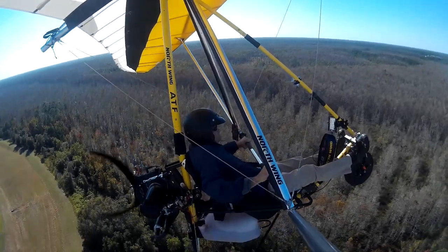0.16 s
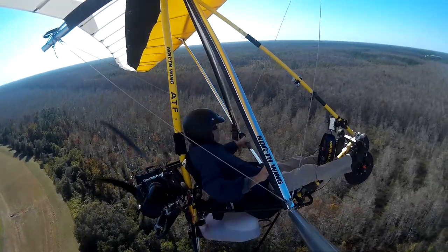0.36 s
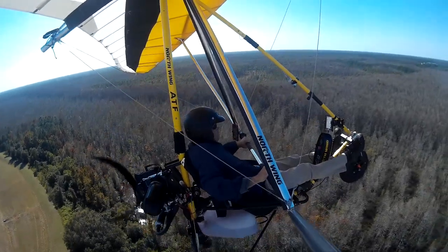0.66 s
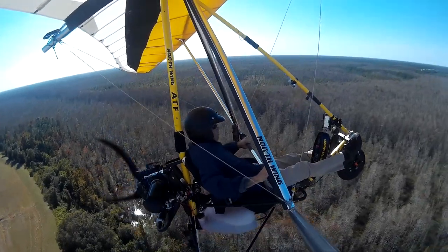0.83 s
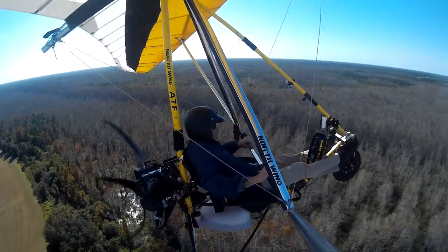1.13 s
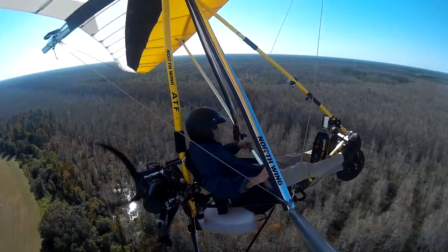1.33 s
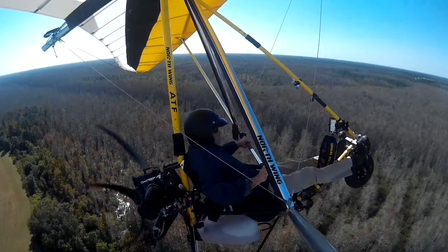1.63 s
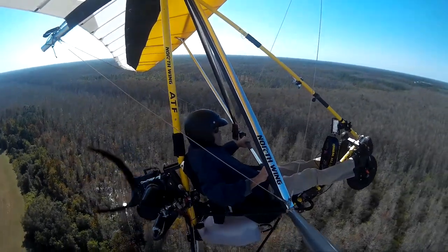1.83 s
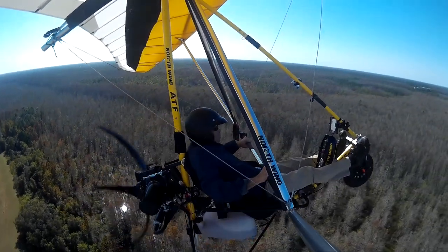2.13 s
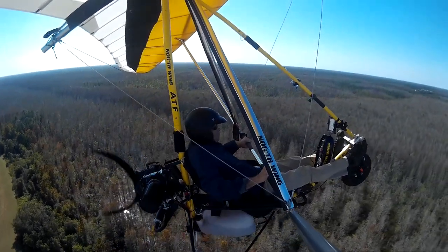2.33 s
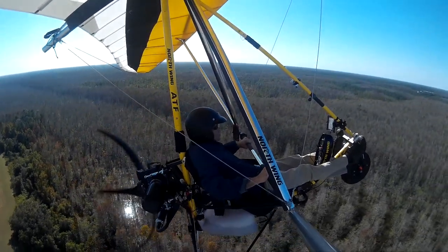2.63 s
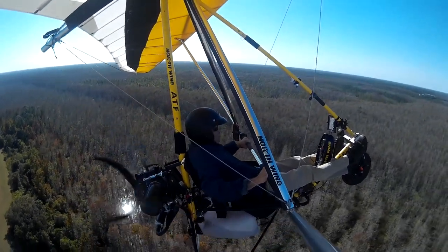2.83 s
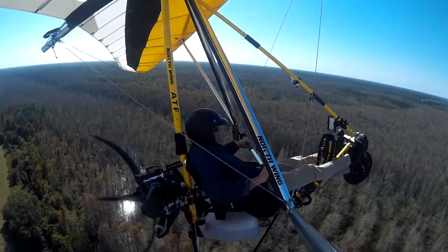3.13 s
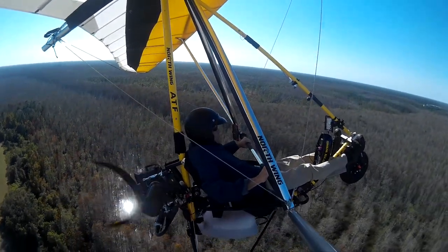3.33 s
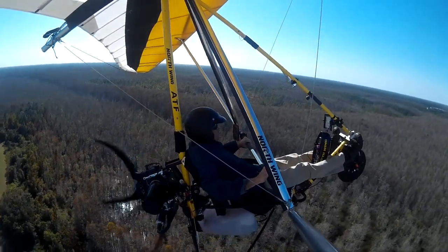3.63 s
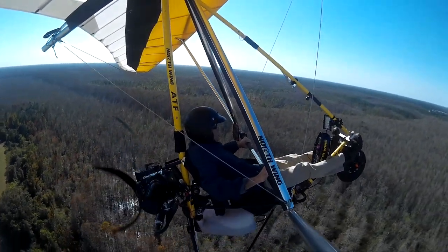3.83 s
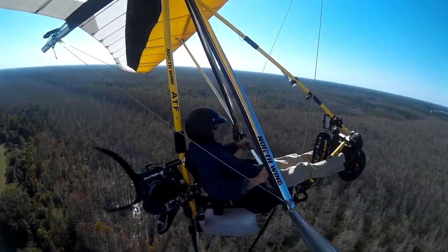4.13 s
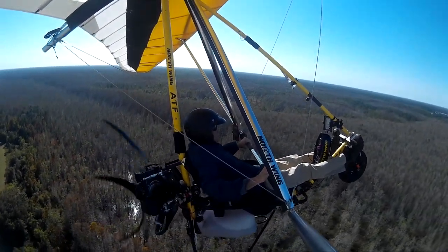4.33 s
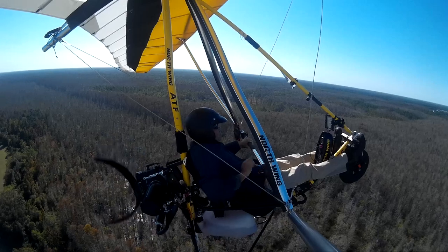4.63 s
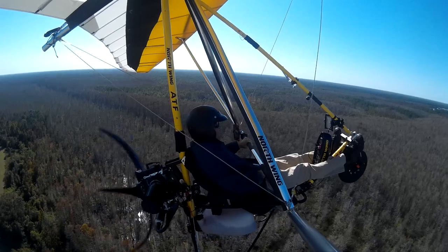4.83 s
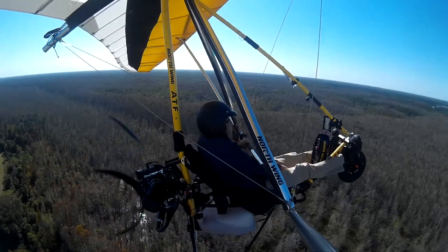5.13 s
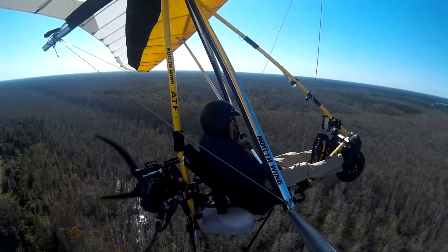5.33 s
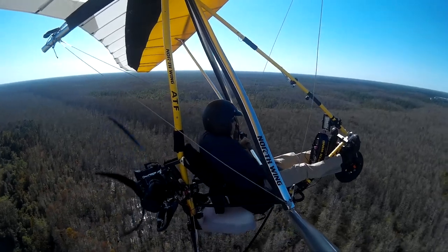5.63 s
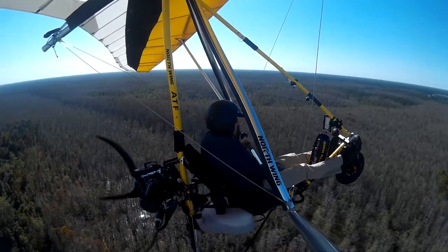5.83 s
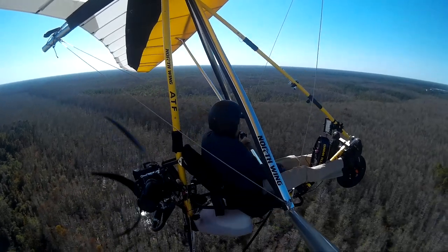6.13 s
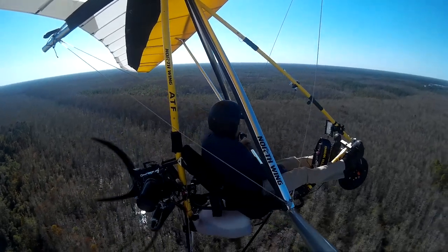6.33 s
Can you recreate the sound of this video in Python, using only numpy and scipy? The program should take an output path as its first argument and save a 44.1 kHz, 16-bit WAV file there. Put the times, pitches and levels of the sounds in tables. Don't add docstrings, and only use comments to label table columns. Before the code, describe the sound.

Steady throbbing propeller and low engine drone in flight, swamped by distorted wind rumble and hiss, with irregular dry clicks and rattling knocks.

```python
import sys
import numpy as np
from scipy import signal
from scipy.fft import rfft, irfft
from scipy.io import wavfile

SR = 44100
rng = np.random.default_rng(int(sys.argv[2]) if len(sys.argv) > 2 else 0)


def boost_factor(decibels):
    exponent = np.asarray(decibels, float) / 20
    return 10 ** exponent


def unload_audio(sound):
    columns = np.transpose(np.atleast_2d(sound))
    steps = np.round(np.clip(columns, -1, 1) * 32767)
    wavfile.write(sys.argv[1], SR, steps.astype(np.int16))


N = 285768

# [t/s, firing rate f/Hz]
FIRING_RATE = [(0, 137.72), (.7, 137.69), (1.8, 137.77), (2.5, 137.66), (3.3, 137.76), (4.1, 137.6),
               (4.8, 137.82), (5.5, 137.7), (6.48, 137.8)]
# [multiple of blade rate, rms level/dB, lag/rad]
BLADE_TONES = [
    (1, -9, 0),
    (2, -11, 1.66),
    (3, -28, 3),
    (4, -33.5, 0.06),
    (5, -48, 4.5),
    (11, -42.5, 4),
]
# [multiple of firing rate, rms level/dB]
ENGINE_TONES = [(1, -18), (2, -18), (3, -32.5), (4, -39), (6, -59), (10, -48.5), (11, -38), (12, -45.5),
                (13, -42), (16, -46), (17, -46), (20, -53), (21, -50.5), (24, -67), (32, -67), (42, -66),
                (49, -65.5), (50, -62), (52, -71), (53, -67), (65, -71), (82, -69), (84, -75)]
EXHAUST_LAGS = [0, 3.075, 1.34]
# [firing multiple, blade multiple, rms level/dB, lag/rad]
CHOPPED_EXHAUST = [(2, -1, -21.5, -1.77), (1, 1, -23.5, -3), (-2, 5, -29.5, 0.77), (-1, 3, -27.5, -2)]
# [t/s, gust level/dB, shaking level/dB]
WIND = [(0, -12, -47), (.45, -11.5, -49.5), (.8, -14.5, -44), (1.3, -13, -41), (1.7, -13, -42.5),
        (1.95, -14, -32), (2.2, -15.5, -42), (2.7, -13, -41.5), (3.2, -14, -47.5), (3.8, -16.5, -40),
        (4.3, -15, -48), (4.63, -14.5, -37.5), (4.9, -14, -42), (5.4, -15, -44.5), (5.9, -16, -41),
        (6.48, -16.5, -44)]
# [f/Hz, level per Hz/dB]
BUFFET_COLOUR = [(60, -16.5), (110, -3.5), (200, 2.5), (300, -2), (500, -13.5), (900, -26.5), (1500, -43)]
# [f/Hz, level per Hz/dB]
RUMBLE_COLOUR = [(16, -30.5), (35, -11), (60, -2.5), (110, -1.5), (170, 0), (320, -14.5)]
# [f/Hz, level per Hz/dB]
HISS_COLOUR = [(500, 3.5), (1000, -2), (1300, -4), (1900, -3.5), (2500, -17.5), (3400, -14.5),
               (3700, -22.5), (5300, -24), (7500, -40.5), (10000, -34), (10900, -39.5), (11700, -33),
               (14000, -48), (16000, -45)]
# [t/s, peak level/dB, bright ring level/dB]
KNOCKS = [(0.025, -19.5, -40), (0.0747, -22.5, -38.5), (0.682, -25, -49), (1.0128, -18.5, -43),
          (1.027, -23, -35.5), (1.0414, -20.5, -42), (1.1414, -25, -50), (1.3318, -23, -46),
          (1.3556, -23.5, -41), (1.3828, -24, -42), (1.557, -22, -34), (1.7325, -24, -38.5),
          (1.8332, -26, -49), (1.914, -24, -45.5), (1.942, -18.5, -37.5), (1.9924, -24, -55),
          (2.4585, -24, -47), (2.7725, -24, -45), (2.8205, -26, -49), (3.7132, -24, -39.5),
          (4.6306, -20, -36), (4.7459, -19.5, -39), (4.8557, -28, -49), (5.0101, -21.5, -38.5),
          (5.1163, -23, -47), (5.46, -25.5, -46), (5.6241, -23.5, -46), (5.7243, -20, -37.5),
          (5.9603, -18.5, -44), (6.0761, -20.5, -47)]
# [t/s, peak level/dB, bright ring level/dB]
TAPS = [(0.2354, -31, -46), (1.2277, -27, -49), (1.459, -28, -48), (1.6886, -26, -45), (2.014, -31, -52),
        (2.066, -32, -52), (2.4927, -25, -48), (4.142, -30, -46), (4.529, -26, -46), (4.5993, -21, -39),
        (4.6455, -26, -44), (5.233, -28, -50), (5.5724, -29, -42), (5.8274, -29.5, -46), (6.0892, -23, -47),
        (6.3335, -28, -51)]
# [f/Hz, width/Hz, level/dB]
FITTING_MODES = [(1810, 450, 6), (4150, 690, 2), (5640, 730, -0.5), (6570, 1900, -8.5), (9960, 1170, 2),
                 (11800, 1000, -6.5), (14500, 1800, -9)]


def rms_one(x):
    return x / np.sqrt(np.mean(x ** 2) + 1e-20)


def in_time(rows):
    s, *columns = np.transpose(rows)
    return [np.interp(np.arange(N) / SR, s, column) for column in columns]


def drift(rate):
    r = np.exp(-80 * np.pi * rate / SR)
    noise = rng.standard_normal(N // 40 + 2002)
    slow = signal.lfilter([1], [1, -2 * r, r * r], noise)[2000:]
    return np.interp(np.arange(N) / 40, np.arange(len(slow)), rms_one(slow))


def propeller(turns):
    phase = 2 * np.pi * 0.7107 * turns
    thump = 0
    for multiple, db, lag in BLADE_TONES:
        level = np.sqrt(2) * boost_factor(db + 0.7 * drift(2.3))
        thump = thump + level * np.cos(multiple * (phase + 0.045 * drift(4.5)) + lag)
    return thump


def engine(turns):
    phase = 2 * np.pi * (turns + 0.004 * drift(9))
    anyhow = rng.uniform(0, 2 * np.pi, len(ENGINE_TONES) - len(EXHAUST_LAGS))
    lags = list(EXHAUST_LAGS) + list(anyhow)
    tones = [(multiple, db, lag) for (multiple, db), lag in zip(ENGINE_TONES, lags)]
    for firing, blades, db, lag in CHOPPED_EXHAUST:
        tones.append((firing + blades * 0.7107, db, lag))
    drone = 0
    for multiple, db, lag in tones:
        level = np.sqrt(2) * boost_factor(db + 2.52 * drift(4.9))
        drone = drone + level * np.cos(multiple * phase + lag)
    return drone


def eddies(colour, shared_db, own_db, rate):
    hz = np.arange(1, N // 2 + 2) * SR / N
    points = np.array(colour)
    colour_db = np.interp(np.log(hz), np.log(points[:, 0]), points[:, 1], -70, -70)
    spectrum = rfft(rng.standard_normal(N)) * boost_factor(colour_db)
    lowest, highest = int(np.log2(points[0, 0])), int(np.log2(points[-1, 0])) + 1
    air, together = 0, drift(rate)
    for octave in range(lowest, highest + 1):
        band = irfft(spectrum * np.clip(1 - abs(np.log2(hz) - octave), 0, 1), N)
        air = air + band * boost_factor(shared_db * together + own_db * drift(rate))
    return rms_one(air)


def buffet(gust_db):
    return boost_factor(-8.5 + 1.73 * gust_db) * eddies(BUFFET_COLOUR, shared_db=1.04, own_db=1.43, rate=15)


def rumble():
    return boost_factor(-9.5) * eddies(RUMBLE_COLOUR, shared_db=1.2, own_db=1.8, rate=11.5)


def resonance(x, hz, width):
    r = np.exp(-np.pi * width / SR)
    return signal.lfilter([(1 - r * r) / 2, 0, (r * r - 1) / 2],
                          [1, -2 * r * np.cos(2 * np.pi * hz / SR), r * r], x)


def rattle(shaking_db):
    s, peak_db, bright_db = np.transpose(KNOCKS + TAPS)
    at = (s * SR).astype(int)
    mean_db = shaking_db.mean()
    struck = rng.random(N) < 220 / SR
    chatter = struck * boost_factor(shaking_db + 2.5 + 2.3 * np.minimum(rng.exponential(1, N), 2.5))
    strays_per_s = 4.5 * boost_factor(2 * (shaking_db - mean_db))
    stray = rng.random(N) < strays_per_s / SR
    chatter += stray * boost_factor(mean_db + 9.5 + rng.normal(0, 2.2, N))

    burst = np.arange(300) / SR
    shape = (1 - np.exp(-burst / 0.001)) * np.exp(-burst / 0.0015)
    grit = rng.choice([-1., 1.], N)
    out = 0
    for k, (hz, width, db) in enumerate(FITTING_MODES):
        bright = hz > 7500
        blows = chatter * boost_factor(-12 * bright)
        knock_db = bright_db + 8.5 if bright else peak_db + 5 - 3 * (hz > 4800)
        blows[at] = boost_factor(knock_db)
        scrape = grit * signal.oaconvolve(blows, shape)[:N]
        out = out + (-1) ** k * boost_factor(db + 9) * resonance(scrape, hz, width)
    return out


def lull():
    marks = np.zeros(N)
    marks[(np.array(KNOCKS + TAPS)[:, 0] * SR).astype(int) + 60] = 1
    return 1 - 0.72 * np.clip(signal.oaconvolve(marks, np.hanning(400), "same"), 0, 1)


def hiss(gust_db, shaking_db):
    level_db = -25.5 + 0.2 * gust_db + 0.19 * (shaking_db - shaking_db.mean())
    return boost_factor(level_db) * eddies(HISS_COLOUR, shared_db=1.1, own_db=-0.2, rate=54)


def scene():
    turns = np.cumsum(in_time(FIRING_RATE)[0]) / SR
    gust_db, shaking_db = in_time(WIND)
    gust_db = gust_db - gust_db.mean()
    low_swing = propeller(turns) + buffet(gust_db) + rumble()
    mix = low_swing * lull() + engine(turns) + rattle(shaking_db) + hiss(gust_db, shaking_db)
    return mix[None]


def band_limit(x):
    return signal.sosfilt(signal.butter(12, 15770, fs=SR, output="sos"), x)


def record(dry):
    overload = 0.7066
    mix = np.clip(dry - 0.002, -overload, overload)
    return band_limit(mix)


dry = scene()
out = record(dry)
unload_audio(out)
```